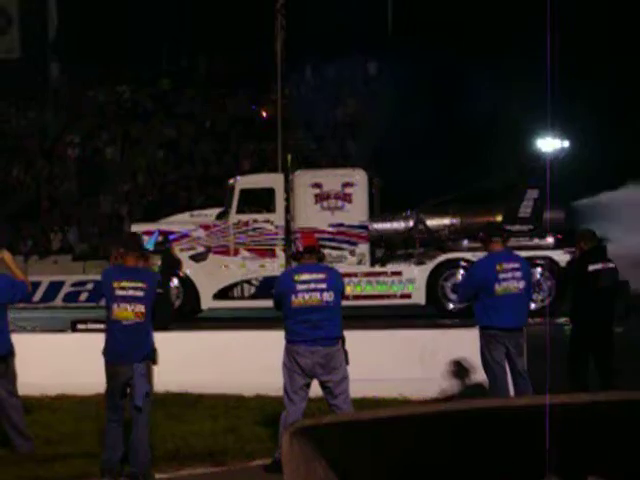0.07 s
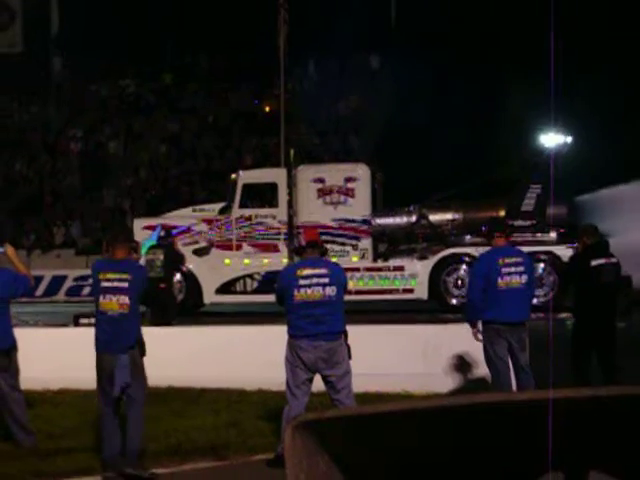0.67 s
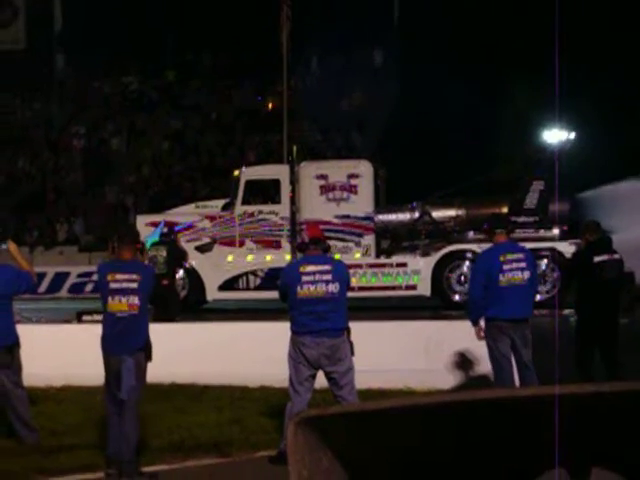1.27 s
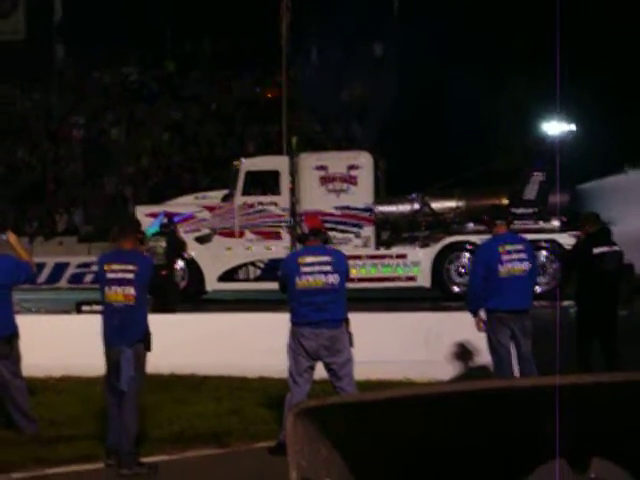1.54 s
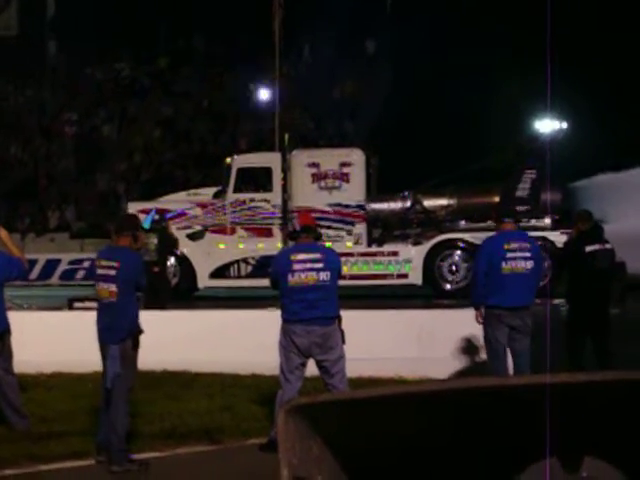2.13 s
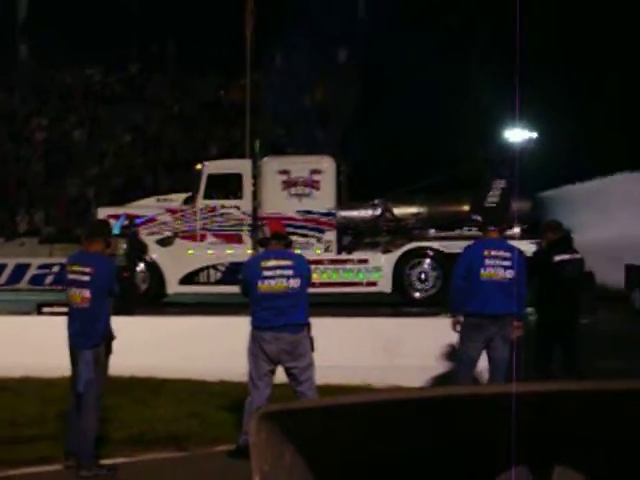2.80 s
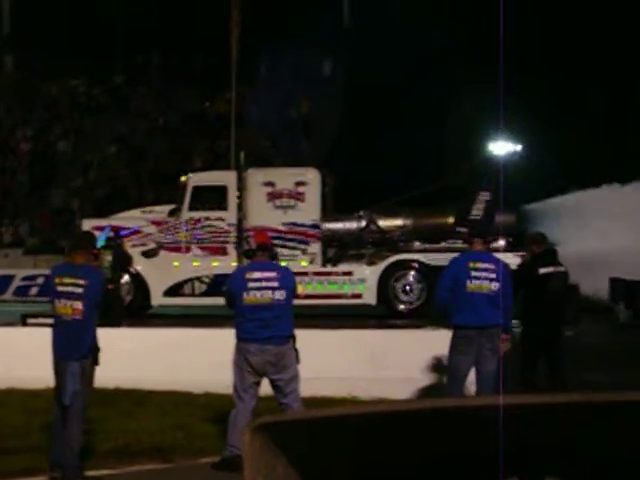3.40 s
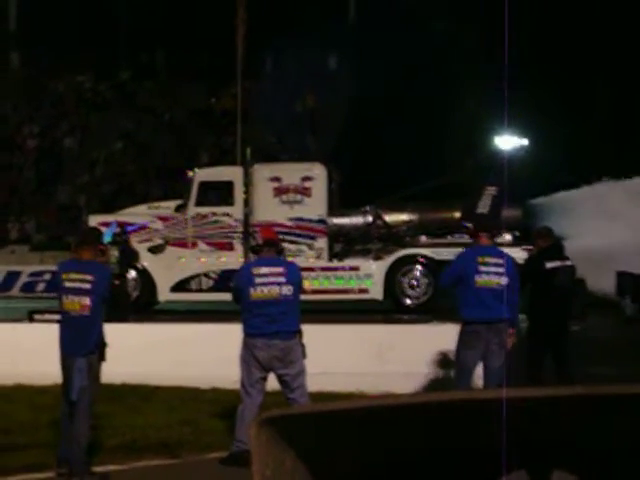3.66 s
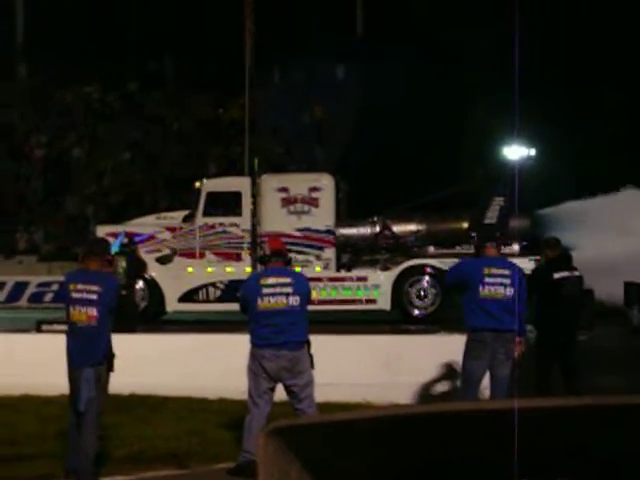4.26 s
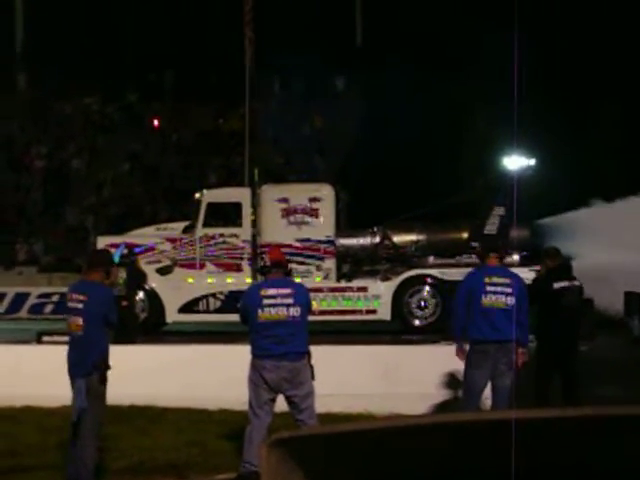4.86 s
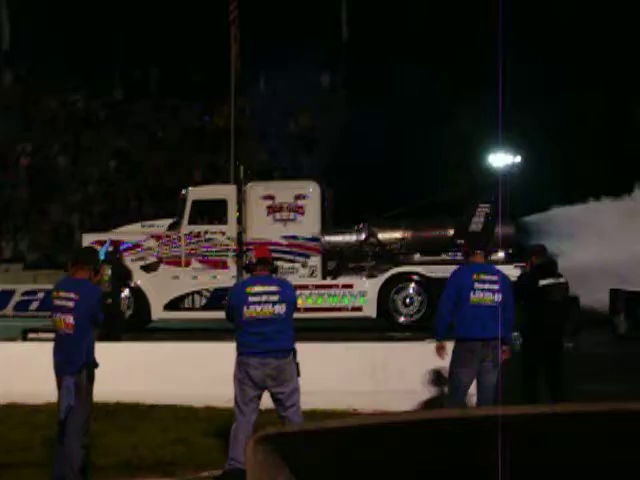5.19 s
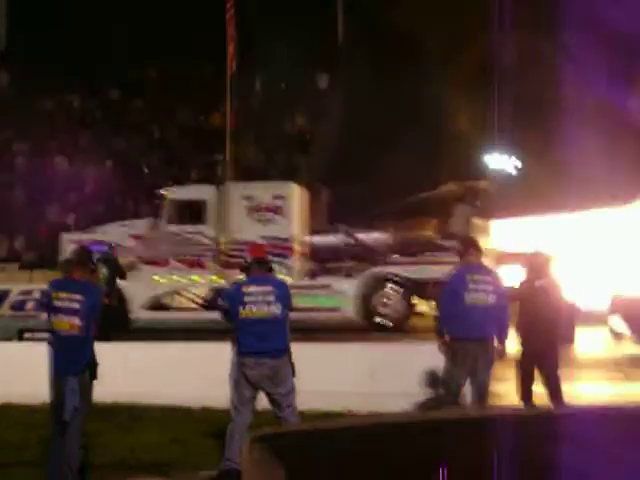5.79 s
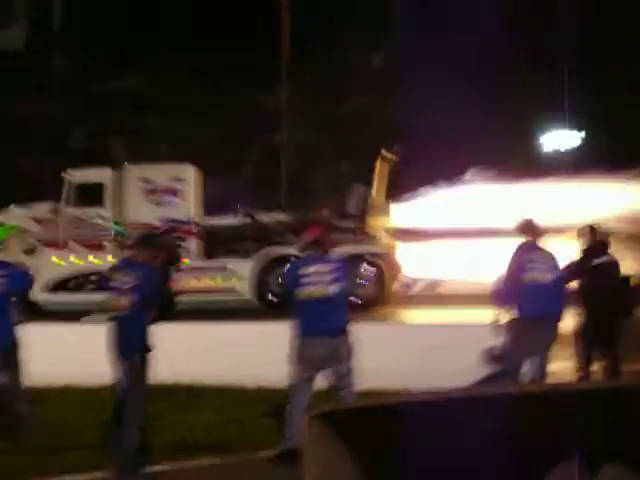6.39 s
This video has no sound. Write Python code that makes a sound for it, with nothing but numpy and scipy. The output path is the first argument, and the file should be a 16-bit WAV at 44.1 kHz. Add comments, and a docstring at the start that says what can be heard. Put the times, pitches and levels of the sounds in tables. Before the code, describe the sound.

Several piercing turbine whines waver and drift against each other above the even roar and intake hiss of a jet-powered truck at a race track. After almost six seconds, a sudden thump opens a far louder, rumbling afterburner blast that lasts to the end while the whine sinks away. The small microphone beside the track has a dull top end and crunches under the blast.

```python
"""A drag strip, behind the wall: a jet truck runs up its three turbojets.
Air hisses and howls in the intakes, three compressors whine at slightly different, drifting speeds,
and the exhausts roar as they mix with the air. Then the afterburners light with a thump, a rumble
and a ragged flame roar. The blast overloads a small camera with a low sample rate."""
import sys
import numpy as np
from scipy import signal
from scipy.fft import rfft, irfft
from scipy.io import wavfile

SR = 44100
rng = np.random.default_rng(int(sys.argv[2]) if len(sys.argv) > 2 else 0)


def bounce(signal):
    """Save signal as a 16-bit WAV file at the path given by the first command-line argument."""
    frames = np.transpose(np.atleast_2d(signal))
    limited = np.clip(frames, -1, 1)
    pcm = np.round(limited * 32767).astype(np.int16)
    wavfile.write(sys.argv[1], SR, pcm)


N = 284445
TIME_S = np.arange(N) / SR
BINS_HZ = np.fft.rfftfreq(N, 1 / SR)


def gain_of(db):
    """Decibels to amplitude."""
    return 10 ** (np.asarray(db) / 20)


def unit_rms(x):
    """Scale to rms 1."""
    return x / np.sqrt(np.mean(abs(x) ** 2) + 1e-20)


def curves(rows):
    """Table columns, interpolated linearly over time."""
    times_s, *columns = np.transpose(rows)
    return [np.interp(TIME_S, times_s, column) for column in columns]


def turbulence(spectrum):
    """Noise of rms 1 with the given spectral shape."""
    hz, db = np.transpose(spectrum)
    shape_db = np.interp(np.log(BINS_HZ + 1), np.log(hz), db)
    return unit_rms(irfft(rfft(rng.standard_normal(N)) * gain_of(shape_db), N))


def drift(rate_hz):
    """Random wander of rms 1, rolling off above rate_hz."""
    rolloff = 1 + (BINS_HZ / rate_hz) ** 2
    return unit_rms(irfft(rfft(rng.standard_normal(N)) / rolloff, N))


def low_pass(x, hz, taps, beta):
    """Kaiser-windowed sinc low-pass."""
    return signal.oaconvolve(x, signal.firwin(taps, hz, window=("kaiser", beta), fs=SR), "same")


def scattered_tone(cycles, share, rate_hz):
    """Tone through hot moving air: a share of its power twinkles, the rest is steady."""
    twinkle = drift(rate_hz) + 1j * drift(rate_hz)
    path = np.sqrt(1 - share) + np.sqrt(share / 2) * twinkle
    carrier = np.exp(2j * np.pi * (cycles + rng.random()))
    return np.sqrt(2) * (path * carrier).real


# Intake hiss spectrum: f/Hz, relative level/dB
HISS_SPECTRUM = [(1200, -29), (2200, -11), (2480, 1), (2730, -3.5), (3120, 2), (3450, -4), (4300, -7),
                 (5250, -6), (5600, -11.5), (6200, -41.5)]
# Intake howl: t/s, f/Hz, level/dB
HOWL_TRACK = [(0, 1928, -34), (1, 1954, -33.5), (2, 2014, -32.5), (3, 2063, -40.5), (4.2, 2113, -33.5),
              (5.6, 2120, -46)]


def intakes():
    """Air hisses into the engines, with a broad howl that slowly rises in pitch."""
    howl_hz, howl_db = curves(HOWL_TRACK)
    howl = gain_of(howl_db) * scattered_tone(np.cumsum(howl_hz) / SR, share=0.94, rate_hz=71)
    hiss_db = -21 + 0.41 * drift(rate_hz=2.4)
    return gain_of(hiss_db) * turbulence(HISS_SPECTRUM) + howl


def governor_hunt(set_hz, swing_hz, period_s, crest_s, damping_s):
    """Blade frequency as a governor overshoots its set speed in a slow, dying swing."""
    swing = np.cos(2 * np.pi * (TIME_S - crest_s) / period_s)
    return set_hz + swing_hz * np.exp(-TIME_S / damping_s) * swing


def rotor_ease(from_hz, to_hz, midway_s, lag_s=0.085):
    """Blade frequency as a heavy rotor slides to a new speed and holds."""
    return to_hz + (from_hz - to_hz) / (1 + np.exp((TIME_S - midway_s) / lag_s))


def blade_tone(cycles, share, skirt_db):
    """A clean twinkling line; inlet turbulence spreads a skirt around it."""
    line = scattered_tone(cycles, share, rate_hz=14)
    skirt = scattered_tone(cycles, share=0.91, rate_hz=63)
    return line + gain_of(skirt_db) * skirt


# Upper tones, cycles per shaft turn: second stage, first-stage octave, sum of both stages
SHAFT_ORDERS = [20, 34, 37]
# Upper tones, one row per engine: second stage/dB, octave/dB, sum tone/dB
ORDER_LEVELS_DB = [(-35, -34, -45), (-40, -32.5, -39.5), (-49, -26, -54.5)]
# First-stage tone of engines A, B, C: t/s, level/dB
BLADE_LEVEL_A = [(0.0, -26), (1.44, -21.0), (1.68, -35), (2.4, -20.5), (2.56, -27.5), (3.84, -23),
                 (4.16, -33), (4.32, -25), (4.48, -35.1), (5.68, -26)]
BLADE_LEVEL_B = [(0.0, -32.8), (0.8, -17.5), (1.76, -19), (2.08, -24), (3.04, -26), (3.2, -31), (3.52, -24),
                 (5.44, -35.2), (5.68, -27)]
BLADE_LEVEL_C = [(0.0, -25.5), (0.32, -16), (0.719, -31), (1.76, -33.5), (2.0, -25), (3.6, -32.5),
                 (3.68, -25), (5.2, -21.5), (5.68, -24)]


def compressors(first_stage_blades=17):
    """Three compressors whine, each with the blade tones of two stages locked to one shaft."""
    engines = [
        (governor_hunt(set_hz=2926, swing_hz=62, period_s=6.58, crest_s=3.59, damping_s=6.2),
         BLADE_LEVEL_A),
        (rotor_ease(from_hz=3141, to_hz=3089, midway_s=0.45), BLADE_LEVEL_B),
        (rotor_ease(from_hz=3189, to_hz=3169, midway_s=0.48), BLADE_LEVEL_C)]
    whine = np.zeros(N)
    for (blade_hz, blade_level), orders_db in zip(engines, ORDER_LEVELS_DB):
        blade_db, = curves(blade_level)
        blade_cycles = np.cumsum(blade_hz) / SR
        shaft_turns = blade_cycles / first_stage_blades
        whine += gain_of(blade_db) * blade_tone(blade_cycles, share=0.11, skirt_db=-14)
        for order, db in zip(SHAFT_ORDERS, orders_db):
            whine += gain_of(db) * blade_tone(shaft_turns * order, share=0.09, skirt_db=-10.5)
    return whine


# Jet mixing spectrum: f/Hz, relative level/dB
EXHAUST_SPECTRUM = [(20, -24.5), (64, -8), (150, 0), (215, -8.5), (275, 0), (340, -9.5), (420, -6.5),
                    (520, -13), (650, -3.5), (810, 0.5), (1130, -5), (1550, -14.5), (2200, -21.5),
                    (5500, -32.5)]
# Exhaust mid-range gain with thrust: t/s, level/dB
THRUST_LEVEL = [(0, -14.5), (1.65, -14), (2.15, -12.5), (3.0, -13.5), (5.7, -13.5)]


def exhaust(boom_db=-13.5):
    """Jet mixing roar: the low boom holds, the mid range swells a little with thrust."""
    thrust_db, = curves(THRUST_LEVEL)
    roar = turbulence(EXHAUST_SPECTRUM)
    boom = low_pass(roar, hz=560, taps=1001, beta=6)
    mid_range = roar - boom
    waver_db = 0.17 * drift(rate_hz=3)
    return gain_of(waver_db) * (gain_of(boom_db) * boom + gain_of(thrust_db) * mid_range)


def light_off_thump(age_s, hz=85, peak_db=8.5, rise_s=0.016):
    """The fuel lights and sends out one low pressure wave."""
    swell = (age_s / rise_s * np.exp(1 - age_s / rise_s)) ** 2
    return gain_of(peak_db) * swell * np.sin(2 * np.pi * hz * age_s)


# Afterburner rumble spectrum: f/Hz, relative level/dB
RUMBLE_SPECTRUM = [(15, -26), (35, -14), (60, -3.5), (110, 1.5), (190, 1.5), (350, -3.5), (700, -38),
                   (2000, -70.5)]


def afterburner_rumble(age_s, base_db=1, rise_s=0.014, surge_db=13.5, surge_s=0.022, sag_db_per_s=7):
    """Rumble surges at light-off, settles, and thins as the truck gathers speed."""
    onset = np.minimum(age_s / rise_s, 1) ** 2
    level_db = base_db + surge_db * np.exp(-age_s / surge_s) - sag_db_per_s * age_s
    return onset * gain_of(level_db) * turbulence(RUMBLE_SPECTRUM)


# Afterburner flame spectrum: f/Hz, relative level/dB
FLAME_SPECTRUM = [(20, -19), (170, -3.5), (300, 2), (510, -6), (740, 1.5), (1150, -2.5), (1600, -13),
                  (2200, -16.5), (3000, -11.5), (4200, -23.5), (5400, -20.5), (7000, -45)]


def afterburner_flame(age_s, base_db=1.25, rise_s=0.031, growth_db_per_s=2):
    """The flame's ragged roar builds just behind the rumble and keeps growing."""
    onset = np.minimum(age_s / rise_s, 1) ** 2
    level_db = base_db + growth_db_per_s * age_s + 0.5 * drift(rate_hz=29)
    return onset * gain_of(level_db) * turbulence(FLAME_SPECTRUM)


def scene():
    """Three engines run, then the afterburners light; the whine sinks as the truck launches."""
    light_off_s, sink_db, sink_s = 5.687, -8, 0.16
    age_s = np.maximum(TIME_S - light_off_s, 0)
    whine = gain_of(sink_db * np.minimum(age_s / sink_s, 1)) * compressors()
    engines = exhaust() + intakes() + whine
    blast = light_off_thump(age_s) + afterburner_rumble(age_s) + afterburner_flame(age_s)
    return (engines + blast)[None]


def record(dry):
    """The input stage overloads, coarse sampling folds high whines down, output peaks are shaved."""
    ceiling, knee, decimation = 0.675, 6, 4
    saturated = dry[0] / (1 + abs(dry[0] / ceiling) ** knee) ** (1 / knee)
    softened = low_pass(saturated, hz=6800, taps=21, beta=3)
    # Tones above 5.5 kHz mirror downwards.
    sampled = softened * decimation * (np.arange(N) % decimation == 0)
    smoothed = low_pass(sampled, hz=SR / decimation / 2, taps=101, beta=6)
    shaved = np.clip(smoothed, -0.7, 0.7)
    return low_pass(shaved, hz=15830, taps=511, beta=9)[None]


dry = scene()
out = record(dry)
bounce(out)
```